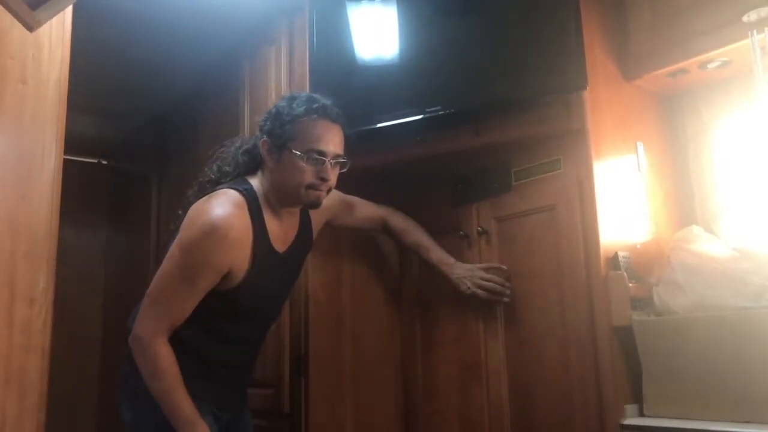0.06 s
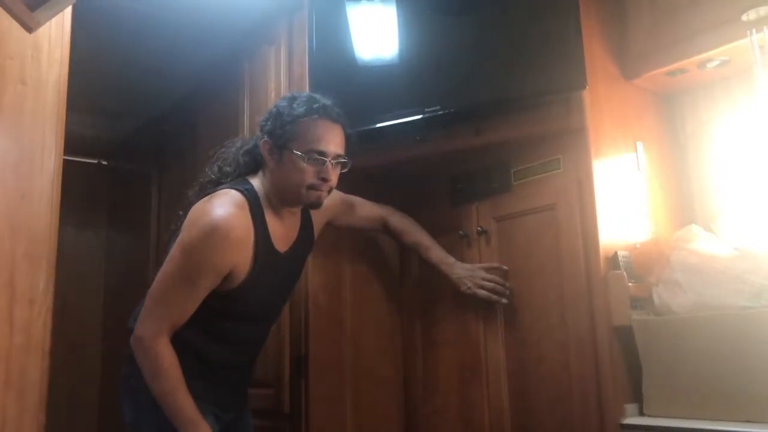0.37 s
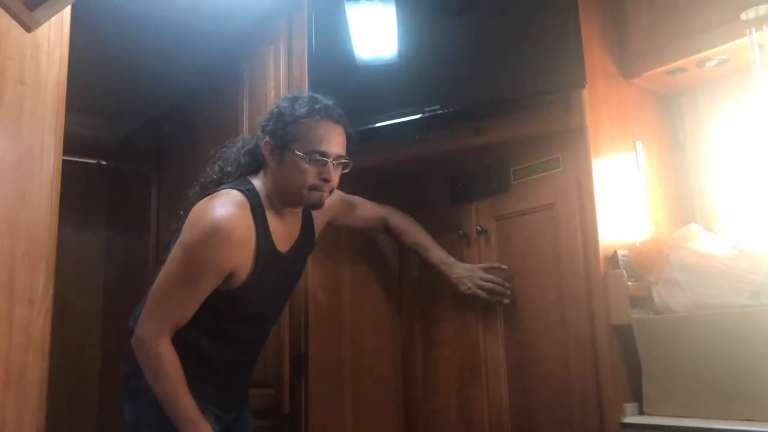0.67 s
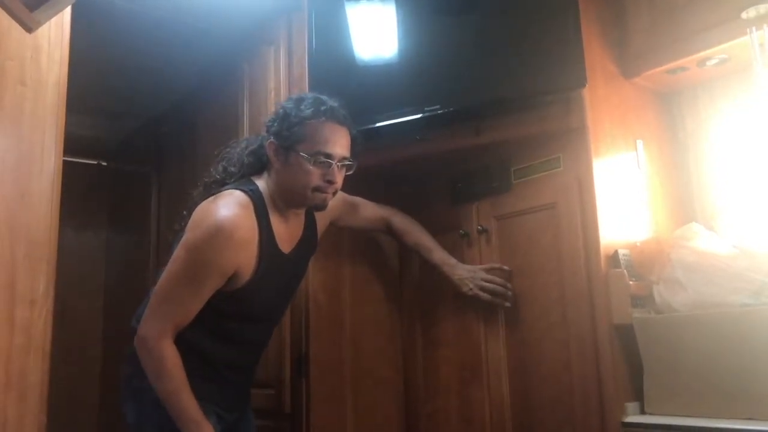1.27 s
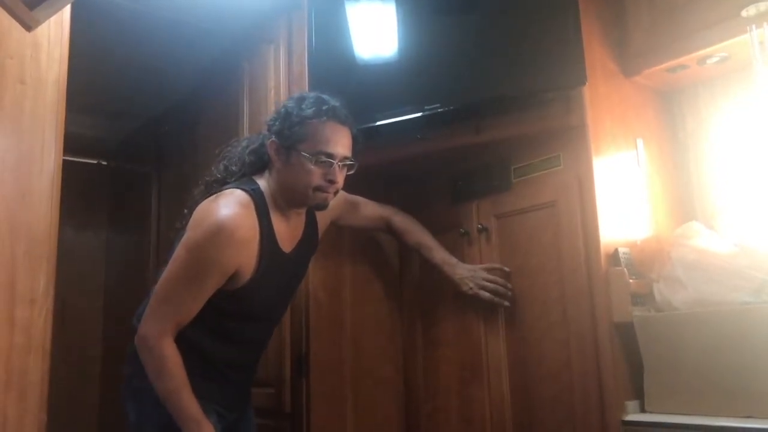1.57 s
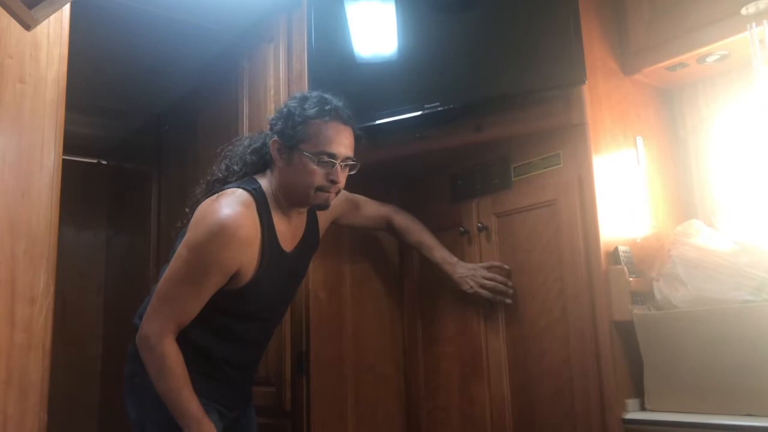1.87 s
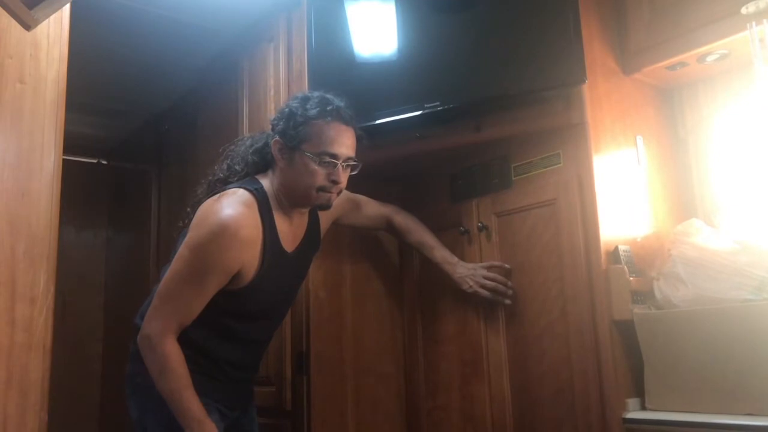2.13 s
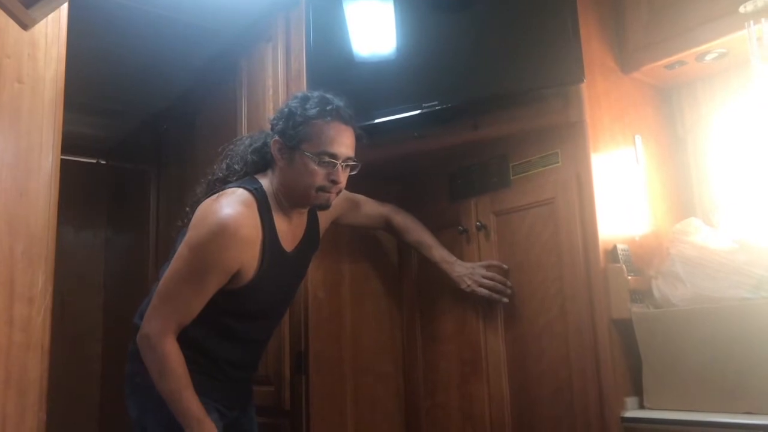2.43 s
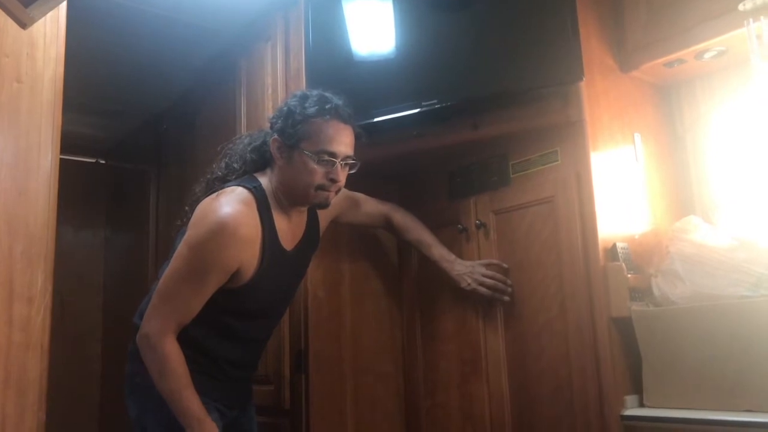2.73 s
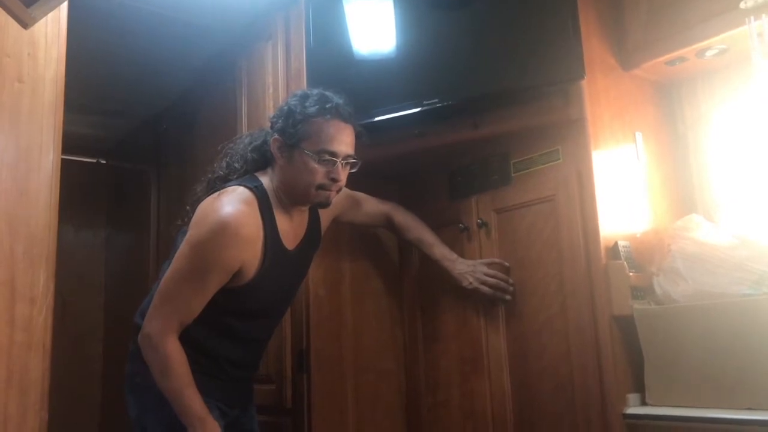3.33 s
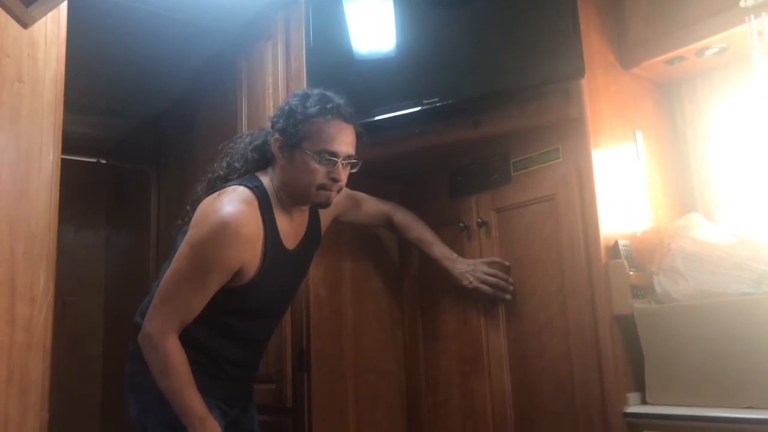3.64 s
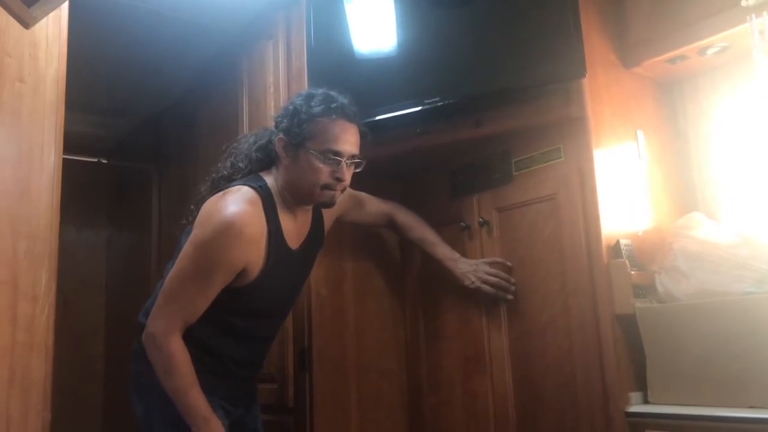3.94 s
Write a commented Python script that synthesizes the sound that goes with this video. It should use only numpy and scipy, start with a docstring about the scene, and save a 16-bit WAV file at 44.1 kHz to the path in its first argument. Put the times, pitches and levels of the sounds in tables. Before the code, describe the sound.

Inside a small wood-panelled camper, a pump makes a quick run of sharp mechanical clacks and lighter return clicks. The clicking stops and one tiny tick follows, while a low hum and soft rumble continue throughout.

```python
"""Small pump in a wood-panelled camper

A pump clicks about five times a second, then stops. Each stroke is a sharp clack, a faint tick as
the mechanism lets go and a softer return click. These impacts excite the modes of one housing and
reverberate in the tight cabin; dull pushes and a low churning go with them. One tiny tick follows.
A motor hums steadily underneath, with cabin rumble, fan air and a thin whine."""
import sys
import numpy as np
from scipy import signal
from scipy.fft import rfft, irfft, next_fast_len
from scipy.io import wavfile

SR = 44100
rng = np.random.default_rng(int(sys.argv[2]) if len(sys.argv) > 2 else 0)


def to_wav(sig):
    """Store sig (one row per channel, or 1-D mono) as 16-bit WAV at the path in sys.argv[1].

    Samples outside -1..1 are clipped; the rate is SR.
    """
    pcm = np.clip(np.atleast_2d(sig), -1, 1) * 32767
    pcm = np.round(pcm).astype(np.int16)
    wavfile.write(sys.argv[1], SR, pcm.T)  # frames by channels


N = 176400
CLICK_SAMPLES = SR // 3

# Working strokes and returns: t/s, level/dB, snap/dB re body, knock/dB re KNOCK_DB, push level/dB
STROKE_CLACKS = [(0.0971, -34, -11, 10.5, -36), (0.3179, -40, -19, 7, -23), (0.5364, -38, -12, 7, -34),
                 (0.7285, -38, -12, 2, -23), (0.9225, -36, -10, 5, -20), (1.1379, -35.5, -10, 3, -23),
                 (1.5233, -36, -8, 3, -27), (1.7345, -36, -7, 1, -21), (1.9322, -37.5, -8, -1, -27),
                 (2.136, -37, -4.5, -16, -25), (2.3468, -38, -7, 4, -28), (2.5485, -36.5, -11, -2, -15.5),
                 (2.7617, -36.5, -5, -8, -21)]
RETURN_CLICKS = [(0.0024, -38.5, -11, 10, -17.5), (0.2214, -48, -17, 3, -29), (0.4426, -47, -11, 0, -21),
                 (0.6426, -45, -2, 9, -17), (0.834, -41, -19, 0, -19), (1.049, -36.5, -11, 2, -19),
                 (1.2516, -38, -7.5, -2, -20.5), (1.4523, -43, -15, 9, -20), (1.6394, -45, -8, 15, -20),
                 (1.8457, -42.5, -13, 3, -27), (2.0419, -40, -14, -12, -21.5), (2.2497, -40, -8, 10, -23),
                 (2.4593, -40.5, -15, 7, -22), (2.6565, -41.5, -13, 11, -24)]
# Ticks as the mechanism lets go: t/s, level/dB, snap/dB re body, knock/dB re KNOCK_DB
RELEASE_TICKS = [(0.1839, -44, -12, 6), (0.384, -47.5, -12, -6), (0.4264, -51.5, -8, 0),
                 (0.6053, -46, -7, 8), (0.8061, -45.5, -8, -2), (1.0085, -46, -13, 5),
                 (1.2218, -45, -8, -4), (1.4187, -57, -13, 3), (1.6182, -47.5, -10, 0),
                 (1.8127, -55, -15, 4), (2.0193, -53.5, -8, 16), (2.2337, -53, -8, 2),
                 (2.431, -48.5, -9, 2), (2.6253, -52, -12, 2)]
# Spectra of the clack, the ticks and returns, the knock and the push: f/Hz, relative density/dB
CLACK_SPECTRUM = [(300, -17), (700, -6), (1150, 1.5), (1800, -4.5), (2700, -10), (3500, -1), (5200, 2),
                  (6400, -0.5), (7400, -7), (8800, -7.5), (10000, -13), (12500, -13.5), (16000, -24)]
LIGHT_SPECTRUM = [(300, -0.5), (1150, 7.5), (2000, -5.5), (2800, -0.5), (3600, 3), (4600, 5.5), (6200, 1.5),
                  (7300, -2.5), (9000, -2), (10300, -30), (12000, -17), (16000, -36)]
KNOCK_SPECTRUM = [(200, -17), (500, -16.5), (800, -6.5), (1150, -3), (1450, 2), (2000, -22), (4000, -38)]
PUSH_SPECTRUM = [(90, -1.5), (150, -0.5), (200, -3), (260, -4.5), (310, -10), (340, 9.5), (450, -4.5),
                 (550, -1), (700, -8), (1200, -8), (1800, -19), (3000, -32)]
# Normal modes of the housing: f/Hz, relative level/dB, T60/s
HOUSING_MODES = [(2694, -9, .12), (3456, -2, .15), (4270, -4, .1), (4685, -2, .12), (4974, -1, .15),
                 (5035, -3, .12), (5381, 1, .11), (5583, -2, .1), (6044, 0, .12), (6386, -2, .12),
                 (7700, -9, .08), (8450, -7, .08), (10680, -8, .09)]
# Early reflections off the cabinets: delay/s, level/dB re direct sound
CABINET_ECHOES = [(.0011, -2), (.0025, -1.5), (.0042, -2.5), (.0056, -0.5), (0.014, -11)]
# Reverberation time of the cabin: f/Hz, T60/s
CABIN_DECAY = [(300, 0.61), (1200, 0.12), (5000, 0.11), (9000, 0.19), (15000, 0.17)]
# Spectra of the churning, the cabin rumble and the fan air: f/Hz, relative density/dB
CHURN_SPECTRUM = [(60, -1.5), (110, -23.5), (210, 4), (270, -5.5), (310, -12.5), (430, -6), (700, -17.5),
                  (1200, -15), (2000, -24), (5000, -34.5), (16000, -45)]
RUMBLE_SPECTRUM = [(20, -26), (33, -24), (50, -2), (70, -13), (95, 1), (115, -8), (145, 0), (175, 1),
                   (194, -9.5), (210, -6), (235, -8.5), (265, -3), (310, -13.5), (340, -2.5), (385, -15.5),
                   (420, -16), (600, -40)]
AIR_SPECTRUM = [(250, -40.5), (420, -12), (500, -7.5), (750, -8), (1000, -8), (1400, -11), (2000, -15),
                (2800, -15.5), (3600, -20), (4800, -22.5), (6800, -24.5), (7300, -29), (9600, -30.5),
                (10400, -38), (11800, -33), (13500, -40), (16000, -45)]
# Envelope of the whine: t/s, level/dB
WHINE_ENVELOPE = [(0, -66), (2.4, -69.5), (2.8, -64.5), (4, -66)]

RING_DB, KNOCK_DB = -10, -16   # relative to the body of a click
SNAP_CUTOFF_HZ = 7500


def pump():
    """Superposition: three trains of impacts, the dull pushes, the churning and one last tick."""
    out = clicks(STROKE_CLACKS, CLACK_SPECTRUM, gain_db=18.5)
    out += clicks(RELEASE_TICKS, LIGHT_SPECTRUM, gain_db=19)
    out += clicks(RETURN_CLICKS, LIGHT_SPECTRUM, gain_db=15.5)
    out += dull_pushes()
    last_tick = from_db(-41) * energy_one(butterworth(contact(), SNAP_CUTOFF_HZ, "high"))
    add(out, last_tick, start_s=3.402)
    return out + churning()


def clicks(rows, spectrum, gain_db, fresh_share=.35):
    """Source and filter: blows on one spot share most of their waveform; the mounting knocks hollowly."""
    out, shared = np.zeros(N), contact()
    for start_s, level_db, snap_db, knock_db, *_ in rows:
        blow = np.sqrt(1 - fresh_share) * shared + np.sqrt(fresh_share) * contact()
        body = energy_one(coloured(blow, spectrum))
        ring = from_db(RING_DB) * housing_ring()
        knock = from_db(KNOCK_DB + knock_db) * energy_one(coloured(blow, KNOCK_SPECTRUM))
        click = body + ring + from_db(snap_db) * snap() + knock
        add(out, from_db(level_db + gain_db) * click, start_s)
    return out


def contact(t60_s=.0054):
    """Room response to an impact: direct crack, early reflections, then a diffuse tail."""
    direct = noise_burst(t60_s)
    direct[0] += from_db(-7)   # impulse at first touch
    return energy_one(direct + reflections(t60_s) + from_db(7) * cabin_tail())


def snap(t60_s=.003):
    """A brief contact has a broad spectrum: its treble, with reflections, is the click's bright edge."""
    direct = noise_burst(t60_s)
    direct[0] += 1   # impulse at first touch
    reflected = from_db(-7) * reflections(t60_s)
    return energy_one(butterworth(direct + reflected, SNAP_CUTOFF_HZ, "high"))


def housing_ring():
    """Free vibration: the housing's damped modes, with amplitude and phase varying from blow to blow."""
    t = np.arange(CLICK_SAMPLES) / SR
    ring = 0
    for hz, level_db, t60_s in HOUSING_MODES:
        amplitude = from_db(level_db + rng.normal(0, .67))
        ring += amplitude * np.sin(2 * np.pi * (hz * t + rng.random())) * decay(t60_s)
    return energy_one(ring)


def dull_pushes(attack_s=.0042, t60_s=.067):
    """Damped transients: each stroke and return gives a thud of low-frequency noise."""
    out = np.zeros(N)
    t = np.arange(CLICK_SAMPLES) / SR
    envelope = decay(t60_s) * (1 - np.exp(-t / attack_s))
    for start_s, *_, push_db in list(STROKE_CLACKS) + list(RETURN_CLICKS):
        thud = coloured(envelope * rng.standard_normal(CLICK_SAMPLES), PUSH_SPECTRUM)
        add(out, from_db(push_db) * energy_one(thud), start_s)
    return out


def churning(stop_s=2.82, fade_s=.11):
    """Amplitude envelope: the pump's low running noise fades linearly after the last stroke."""
    t = np.arange(N) / SR
    running = np.clip(1 - (t - stop_s) / fade_s, 0, 1)
    return from_db(-51) * running * noise(CHURN_SPECTRUM)


def reflections(t60_s):
    """Path delay: the cabinets return a crack as later, weaker bursts of noise."""
    out = np.zeros(CLICK_SAMPLES)
    for delay_s, level_db in CABINET_ECHOES:
        delayed = np.pad(noise_burst(t60_s), (int(delay_s * SR), 0))
        out += from_db(level_db) * delayed[:CLICK_SAMPLES]
    return out


def cabin_tail():
    """Diffuse reverberation: each band decays at its own rate, and the bass lasts longest."""
    edges_hz = np.geomspace(100, 20000, 9)
    tail = 0
    for low, high in zip(edges_hz, edges_hz[1:]):
        band = butterworth(rng.standard_normal(CLICK_SAMPLES), [low, high], "band")
        tail += band * decay(at_hz(CABIN_DECAY, np.sqrt(low * high)))
    return energy_one(tail)


def motor(hum_hz=57.6, whine_hz=797.5, wander_hz=.6):
    """Periodic vibration gives pure tones: a low hum and a thin whine of slightly wandering pitch."""
    t = np.arange(N) / SR
    hum = from_db(-33) * rms_one(np.sin(2 * np.pi * hum_hz * t))
    whine_phase = 2 * np.pi * np.cumsum(whine_hz + wander_hz * drift(corner_hz=4.6)) / SR
    whine_gain = from_db(np.interp(t, *np.transpose(WHINE_ENVELOPE)))
    return hum + whine_gain * rms_one(np.sin(whine_phase))


def fan_air(duct_hz=868, bandwidth_hz=26):
    """Broadband flow noise, with one narrow resonance of the fan's air path."""
    resonator = signal.iirpeak(duct_hz, duct_hz / bandwidth_hz, fs=SR)
    duct = rms_one(signal.lfilter(*resonator, rng.standard_normal(N)))
    return from_db(-56.5) * noise(AIR_SPECTRUM) + from_db(-68) * duct


def cabin_rumble():
    """Stationary noise with low spectral peaks, heard as a steady rumble."""
    return from_db(-45) * butterworth(noise(RUMBLE_SPECTRUM), 700, "low")


def from_db(db):
    """Amplitude ratio of a level in decibels."""
    return 10 ** (np.asarray(db) / 20)


def rms_one(x):
    """Normalisation to unit mean power."""
    return x / np.sqrt(np.mean(x ** 2) + 1e-20)


def energy_one(x):
    """Normalisation to unit energy."""
    return x / np.sqrt(np.sum(x ** 2) + 1e-20)


def at_hz(points, hz):
    """Interpolation on a logarithmic frequency axis."""
    f, value = np.transpose(points)
    return np.interp(np.log(np.maximum(hz, 1)), np.log(f), value)


def butterworth(x, cutoff_hz, kind):
    """Maximally flat filter with skirts of 12 dB per octave."""
    return signal.sosfilt(signal.butter(2, cutoff_hz, kind, fs=SR, output="sos"), x)


def coloured(x, spectrum):
    """Minimum-phase filter: folding the cepstrum gives a causal response with the given spectrum."""
    size = 2 * next_fast_len(len(x))
    magnitude = from_db(at_hz(spectrum, np.fft.rfftfreq(size, 1 / SR)))
    cepstrum = irfft(np.log(magnitude))
    cepstrum[1:size // 2] *= 2
    cepstrum[size // 2 + 1:] = 0
    return irfft(rfft(x, size) * np.exp(rfft(cepstrum)))[:len(x)]


def noise(spectrum):
    """Filtered white noise in its steady state, at unit rms."""
    return rms_one(coloured(rng.standard_normal(N + SR), spectrum)[SR:])


def drift(corner_hz):
    """Low-pass noise: a slow random wander of unit rms."""
    f = np.fft.rfftfreq(N, 1 / SR)
    return rms_one(irfft(rfft(rng.standard_normal(N)) / (1 + (f / corner_hz) ** 2), N))


def decay(t60_s):
    """Exponential damping: a fall of 60 dB in t60_s."""
    return from_db(-60 * np.arange(CLICK_SAMPLES) / SR / t60_s)


def noise_burst(t60_s):
    """Exponentially damped white noise of unit energy."""
    return energy_one(rng.standard_normal(CLICK_SAMPLES) * decay(t60_s))


def add(out, sound, start_s):
    """Superposition of a sound on the output from start_s on."""
    i = int(start_s * SR)
    out[i:i + len(sound)] += sound[:N - i]


def scene():
    """Superposition of the pump and the steady background, in mono."""
    return (pump() + motor() + fan_air() + cabin_rumble())[None]


def record(dry):
    """Band limiting: an elliptic low-pass cuts steeply above 15.9 kHz."""
    return signal.sosfilt(signal.ellip(10, .1, 80, 15900, fs=SR, output="sos"), dry)


dry = scene()
out = record(dry)
to_wav(out)
```